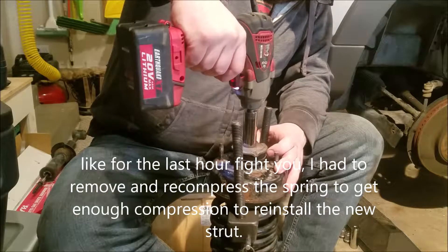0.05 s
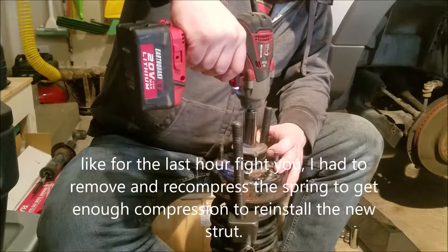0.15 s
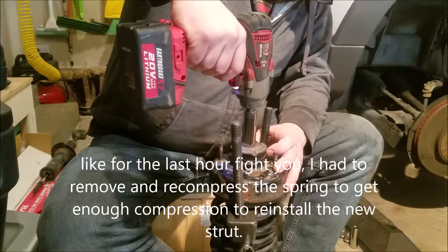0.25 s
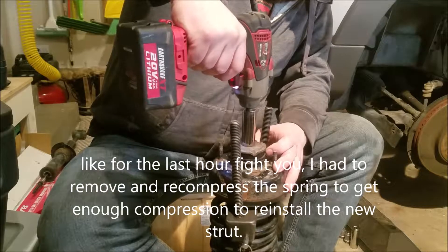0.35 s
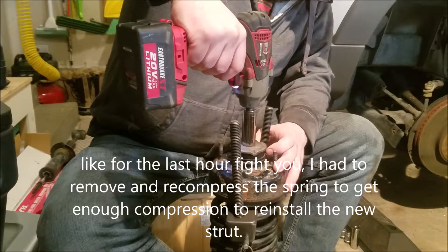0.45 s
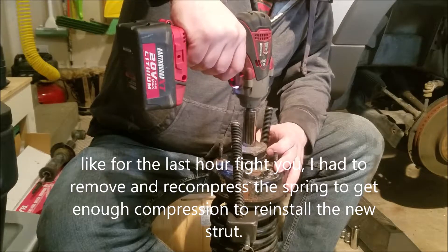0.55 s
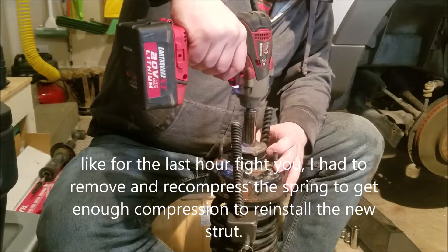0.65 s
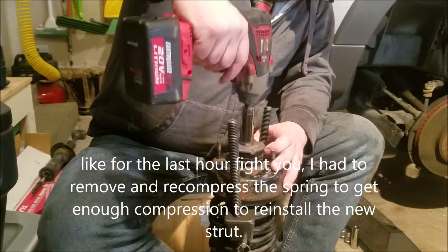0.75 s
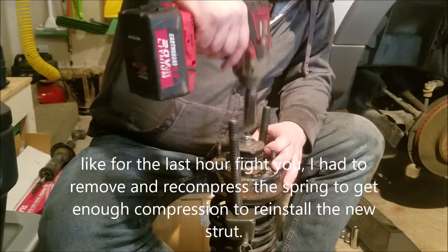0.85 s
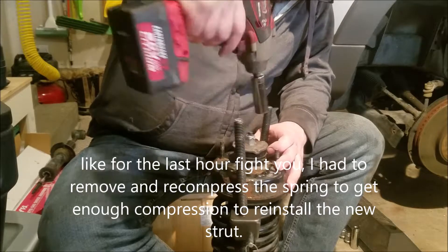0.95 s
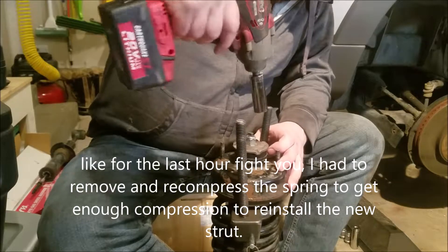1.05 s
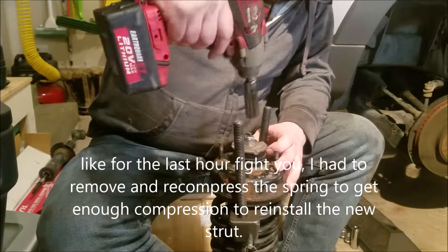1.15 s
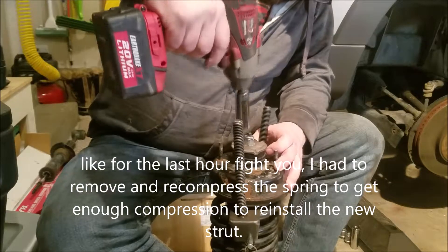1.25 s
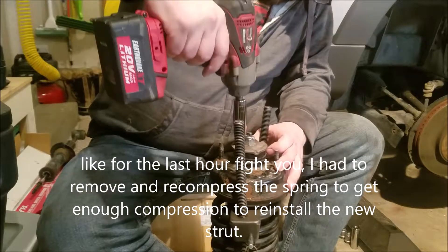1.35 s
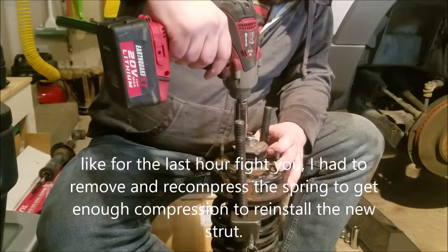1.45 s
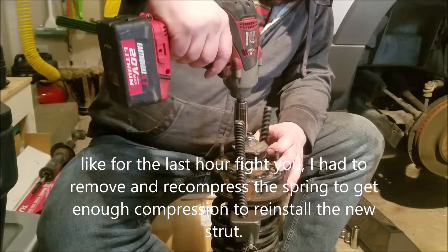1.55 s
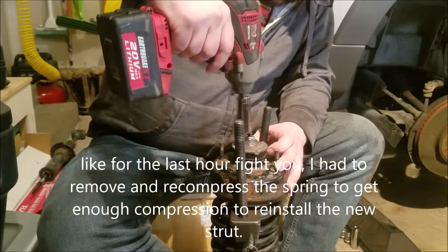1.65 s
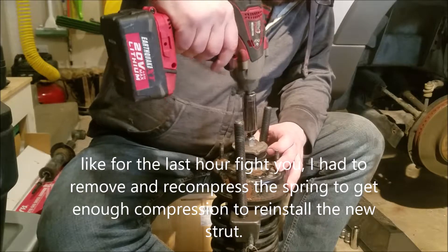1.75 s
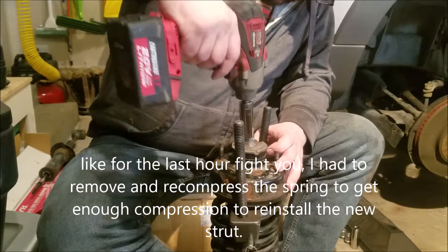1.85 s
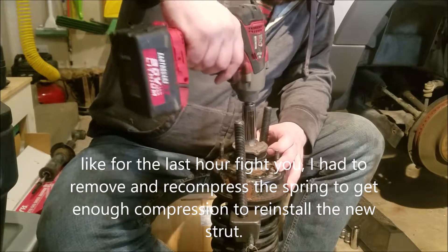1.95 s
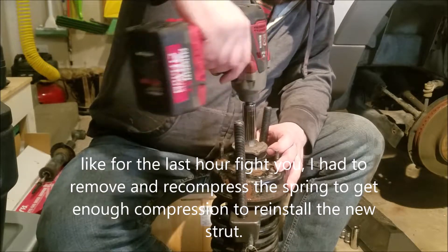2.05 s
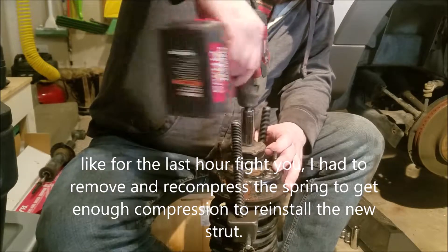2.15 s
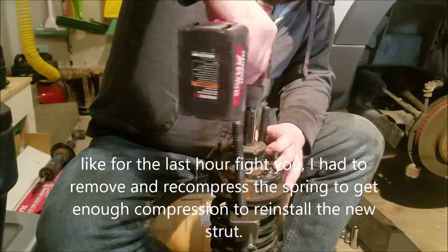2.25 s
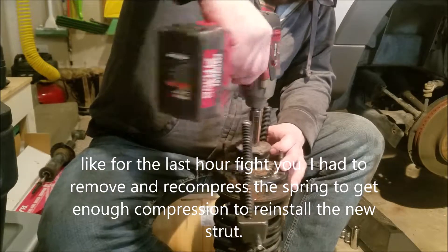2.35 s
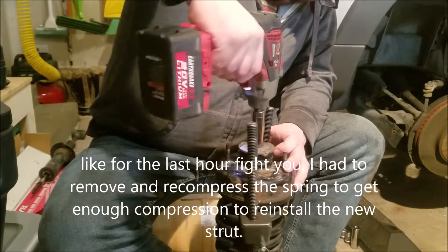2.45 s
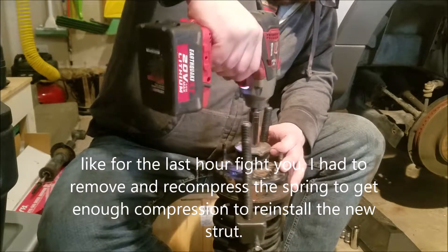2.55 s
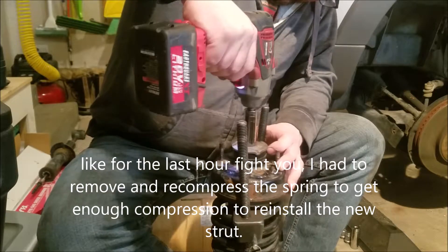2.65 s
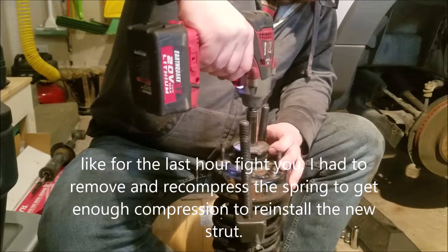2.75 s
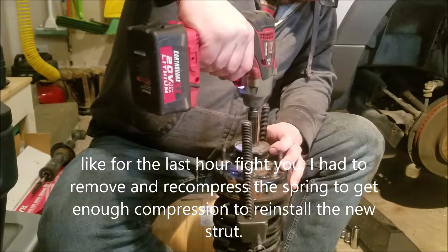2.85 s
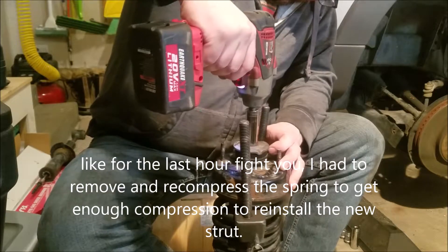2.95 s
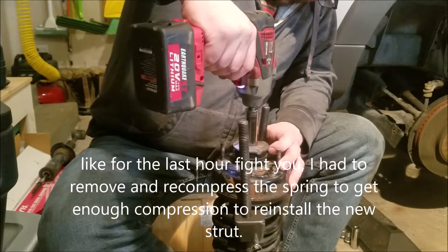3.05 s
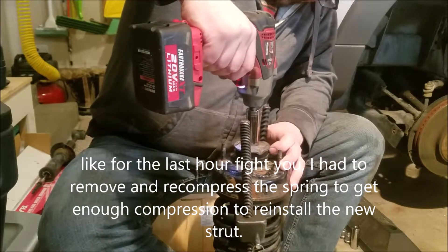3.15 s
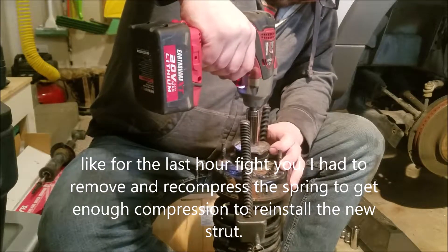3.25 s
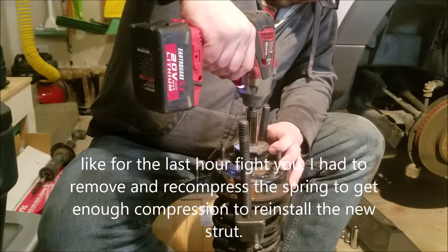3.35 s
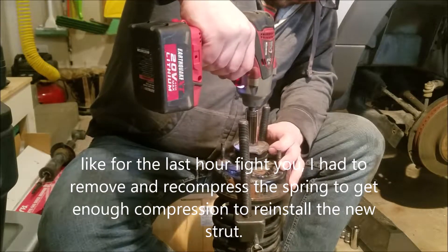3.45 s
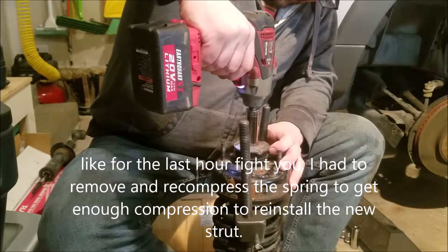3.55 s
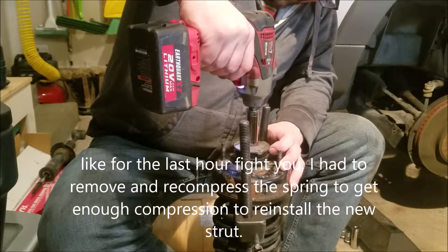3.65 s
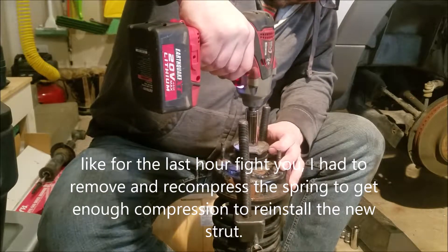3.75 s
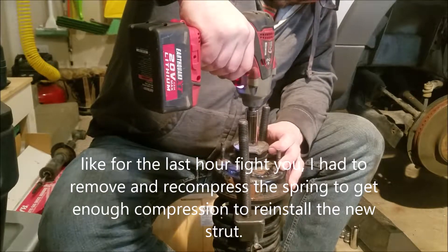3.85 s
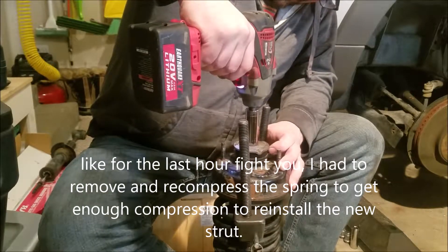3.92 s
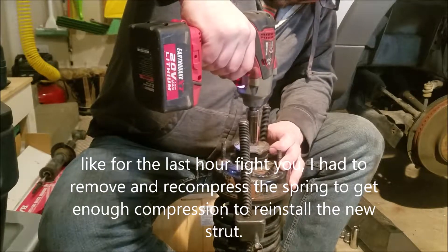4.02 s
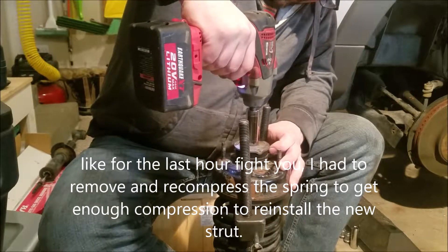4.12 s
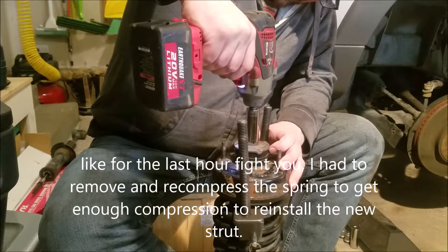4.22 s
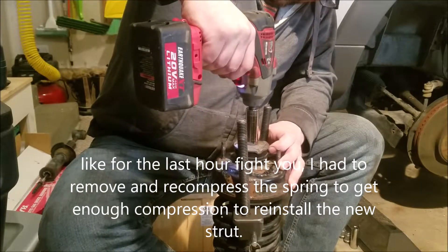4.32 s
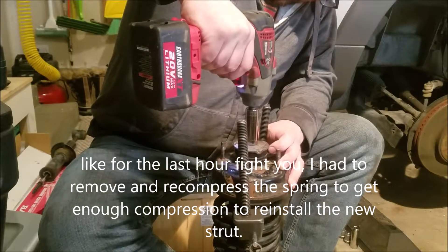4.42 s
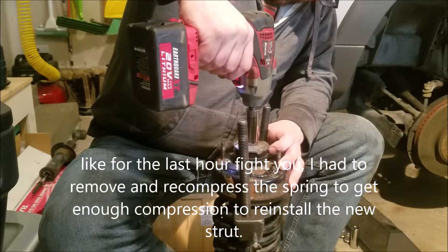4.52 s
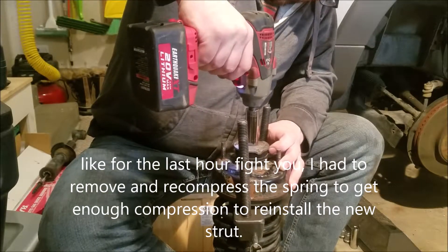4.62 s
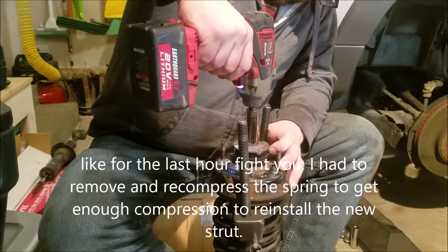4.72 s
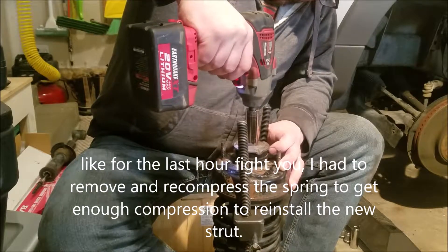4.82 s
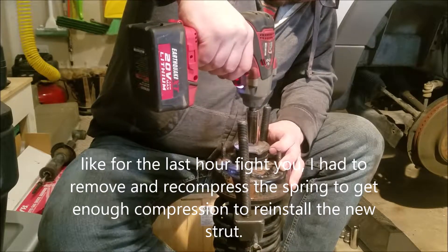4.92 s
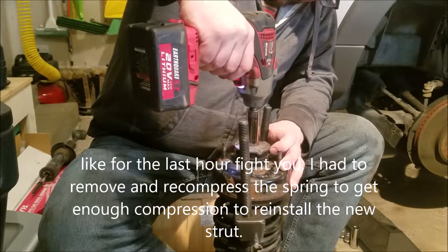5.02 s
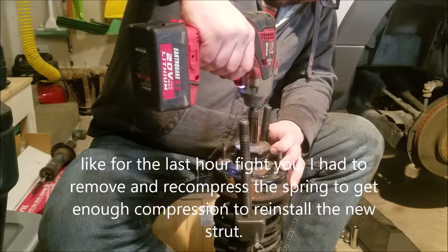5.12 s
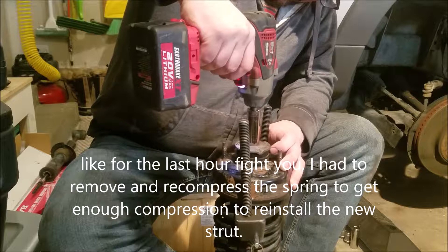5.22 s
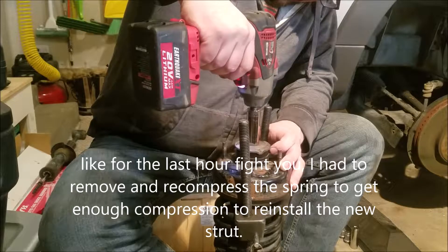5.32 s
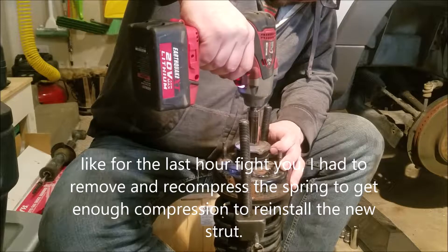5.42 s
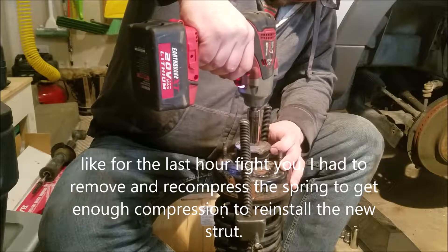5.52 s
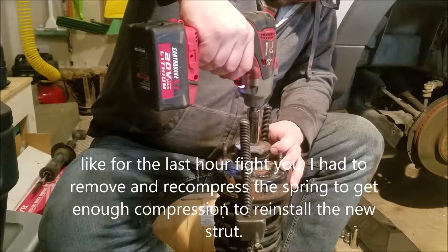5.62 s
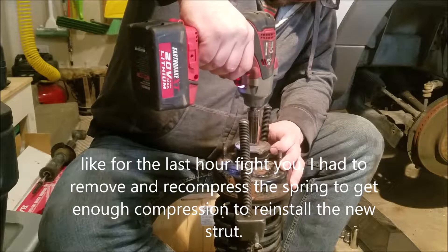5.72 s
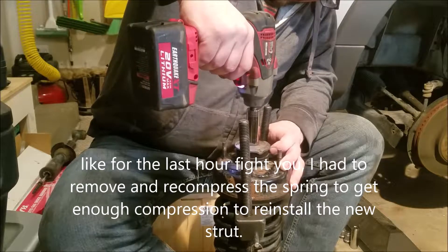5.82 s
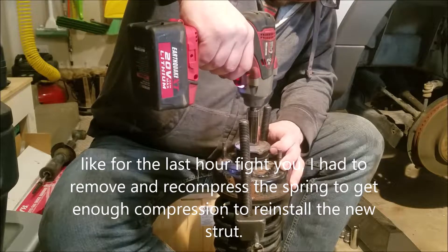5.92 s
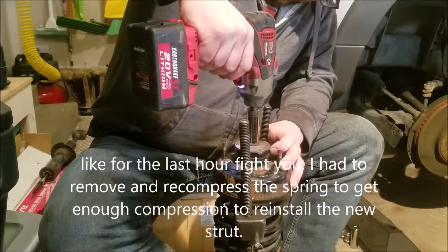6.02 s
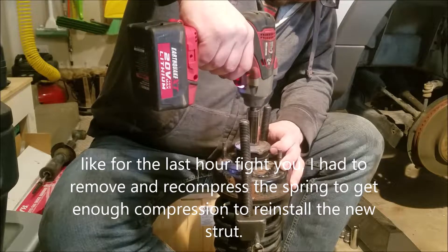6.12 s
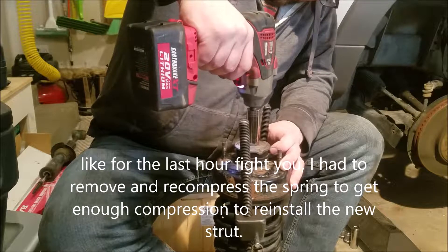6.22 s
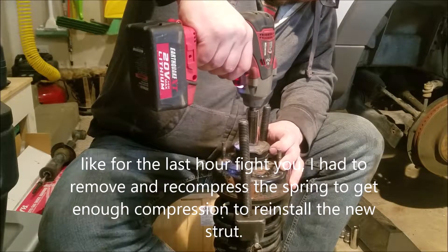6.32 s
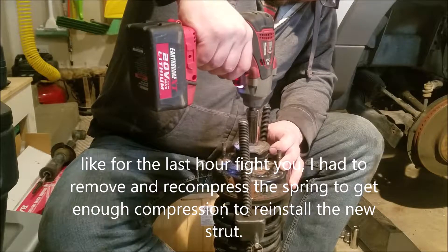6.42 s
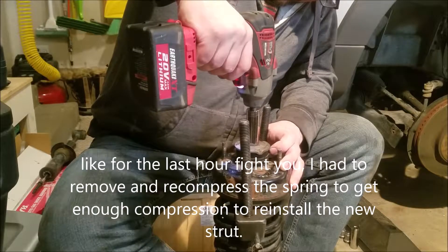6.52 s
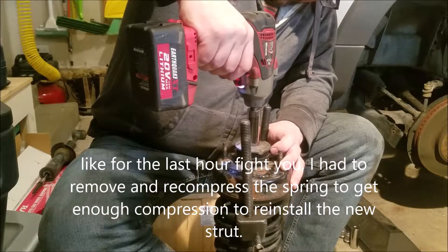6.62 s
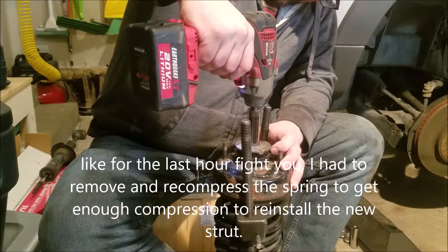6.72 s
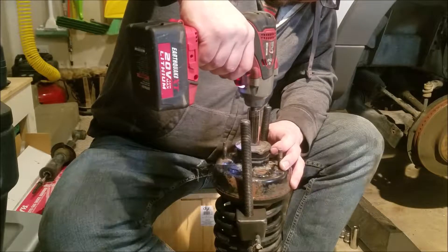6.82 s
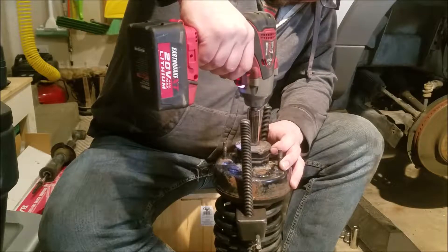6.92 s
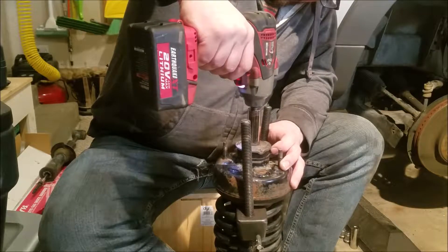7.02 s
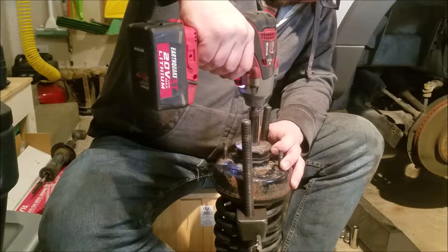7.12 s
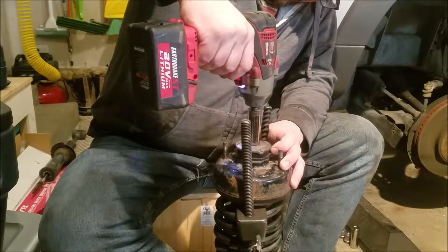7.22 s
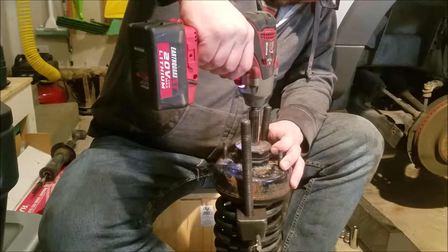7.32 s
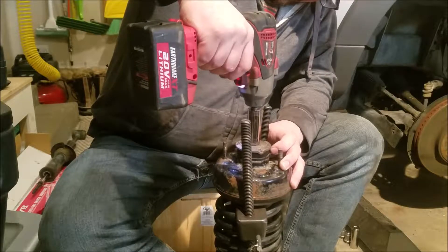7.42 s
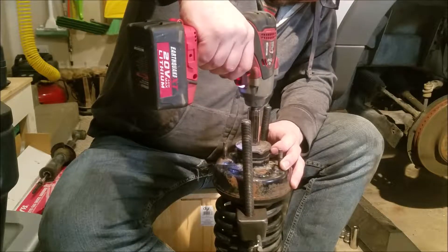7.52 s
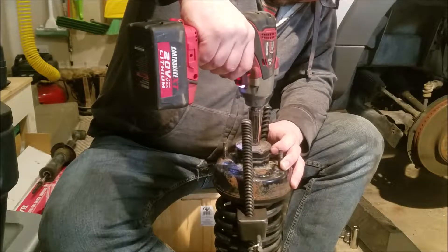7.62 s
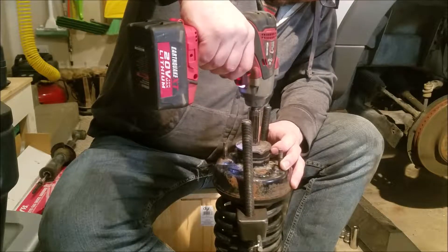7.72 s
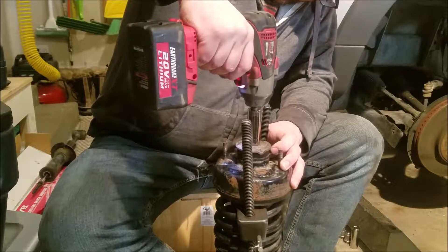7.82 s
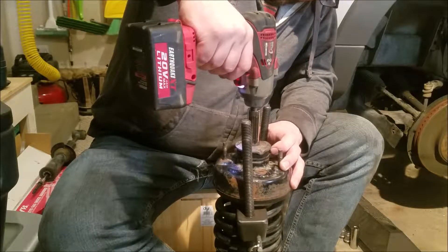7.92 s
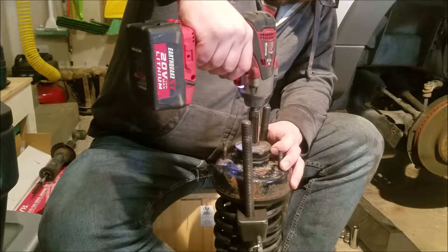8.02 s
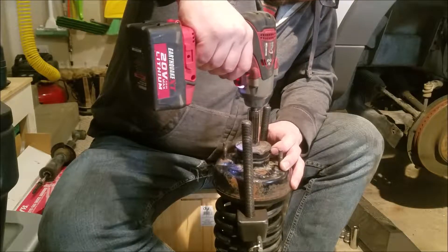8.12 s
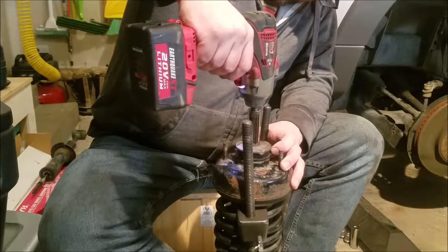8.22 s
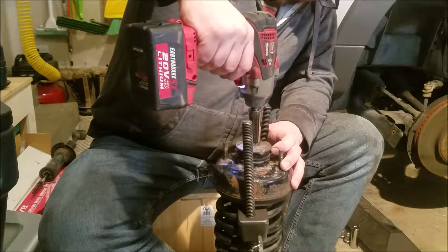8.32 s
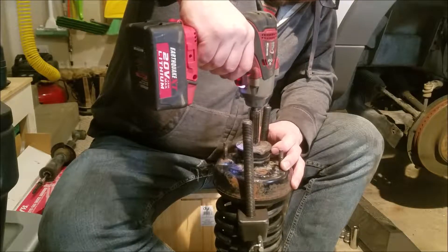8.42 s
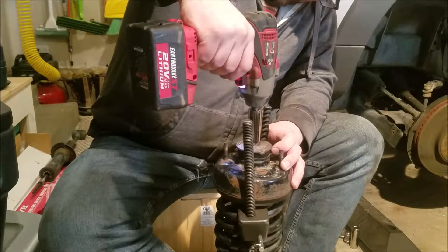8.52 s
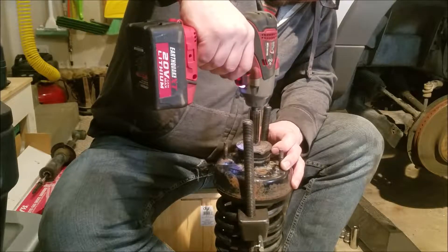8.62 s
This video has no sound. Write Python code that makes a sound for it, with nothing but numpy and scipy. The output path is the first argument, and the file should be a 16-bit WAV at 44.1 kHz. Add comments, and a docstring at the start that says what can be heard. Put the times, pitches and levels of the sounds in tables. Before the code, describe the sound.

A brief burst of loose, chattering impact-wrench hammering cuts off, leaving a short garage reverberation and near silence. The socket taps and rubs against threaded steel with sharp little clacks, then duller bumps. The tool kicks in again and pounds without a break at a buzzing fast rate, bright, clashing and metallic, with slightly uneven blows. Close stereo microphone, hard reflective room, occasional soft low pops on the left side.

```python
"""In a small garage, a cordless impact wrench hammers a nut down the threaded rod of a spring strut.
It stops, the socket is lifted, tapped and seated on the nut again; hammering resumes at about 56 blows a second.
Each blow is a click that drives a noisy steel clash and resonances of socket, hammer case, strut, spring and nut.
Knocks are ringing modes with a thud, and rubbing is coloured grit; all of these reverberate in the garage.
Short pressure pops, almost only on the left, a faint low flutter and still air lie outside the reverberation."""
import sys
import numpy as np
from scipy import signal
from scipy.fft import rfft, irfft, next_fast_len
from scipy.io import wavfile

SR = 44100
rng = np.random.default_rng(int(sys.argv[2]) if len(sys.argv) > 2 else 0)


def dump(signal):
    """Clip the signal to [-1, 1] and save it as 16-bit WAV at the path in sys.argv[1]."""
    limited = np.clip(np.atleast_2d(signal).T, -1, 1)
    pcm = np.round(limited * 32767).astype(np.int16)
    wavfile.write(sys.argv[1], SR, pcm)


N = 382347
TIME = np.arange(N) / SR

# All table levels are relative within the mix.
# Colour of the still garage. Each row: frequency in Hz, density in dB per Hz.
AIR_COLOUR = [(15, -26.5), (25, 2), (142, 5), (196, 0), (326, -5), (573, -3), (2240, -10), (5010, -22.5),
              (15000, -36.5)]
# Garage reverberation. Each row: frequency in Hz, t60 in seconds, level in dB.
GARAGE_DECAY = [(150, .45, -10), (500, .42, -11), (1400, .42, -7.5), (2500, .42, -3.5), (7000, .34, -3),
                (15000, .27, -3)]
# The loudest pops. Each row: time in seconds, peak in dB.
LOUD_POPS = [(0.282, -20.5), (0.354, -25), (0.547, -25), (0.567, -17), (0.6, -19.5), (4.526, -23),
             (4.596, -20.5), (4.988, -18), (5.062, -23), (5.151, -20.5), (5.256, -22.5), (5.381, -23),
             (6.576, -21.5), (6.72, -19.5), (7.507, -17.5), (7.811, -26), (7.866, -16.5), (7.973, -15),
             (8.513, -21), (8.546, -23)]
# Colour of sliding steel. Each row: frequency in Hz, density in dB per Hz.
SLIDE_COLOUR = [(60, -13), (130, -9), (250, 2), (620, 15), (1000, 5.5), (1500, 7.5), (2800, 2.5),
                (4500, -8.5), (8000, -27), (15000, -14)]
# The socket rubs along the steel. Each row: start and end in seconds, starting level in dB, swell in dB.
RUBS = [(1.333, 1.57, -65.5, -7), (1.577, 1.832, -67, 6), (1.835, 1.92, -33, -5), (2.073, 2.167, -38.5, -1),
        (2.215, 2.39, -58, -4), (2.394, 2.43, -51, 30)]
# The socket knocks on rod and nut. Each row: time in seconds, level in dB, low-pass edge in Hz, thud share in dB.
KNOCKS = [(1.331, -43, 2240, -22), (1.425, -36, 2480, -28), (1.833, -22, 9300, -3),
          (1.838, -22.5, 6000, -1), (1.872, -34, 7000, 0), (1.899, -20, 5030, -3.5),
          (2.052, -38, 2500, -21), (2.071, -28.5, 7100, -26), (2.121, -36, 3970, 9), (2.14, -26, 4500, 4),
          (2.261, -44, 1200, 12), (2.324, -37, 1200, 6.5), (2.343, -37, 1180, 7)]
# What the knocks ring, before chance shifts. Each row: frequency in Hz, level in dB, t60 in seconds.
KNOCK_MODES = [(560, 0, 0.04), (650, -7, 0.053), (790, -2, 0.056), (1470, 4.5, 0.048), (1580, -7, .03),
               (1880, -7, 0.026), (2150, 1, 0.034), (2450, 5, 0.03), (2900, 4.5, 0.044), (3170, 3, 0.023),
               (3680, 1, 0.019), (11200, 6, .012), (13300, 5, .012), (14500, -6, .012)]
# The trigger is held. Each row: start and end in seconds, blows per second short of full speed at first,
# socket off its seat at first (0-1), nut loose at first (0-1).
TRIGGER_RUNS = [(0.001, 0.695, 8.1, 1, 0), (2.485, 8.66, 0, 0, 1)]
# Single blows as the hammer runs down or catches. Each row: time in seconds, strength in dB.
STRAY_BLOWS = [(0.715, -12), (2.424, -4), (2.449, -3), (2.459, 6)]
# Blows of set strength. Each row: time in seconds (the nearest blow is used), strength in dB.
HARD_BLOWS = [(.408, 1.5), (4.242, 2), (5.314, 1.5), (5.846, 1), (6.346, 2), (6.382, 3), (8.639, 1)]
# How strongly each part answers the blows. Each entry: level in dB, extra dB with the socket off its seat,
# extra dB with the nut loose, drift in dB per second of tightening.
COUPLING = {"clash": (-4, 3, 2, 0.28), "case": (-6, -2.5, -1, 0.15), "strut": (-3.5, -17, 2.5, -1.2),
            "strut overtones": (-6.5, -7, 3.5, 0), "socket": (-1.25, -17.5, -1.5, -.5),
            "nut": (-2, -8, 4, -1.77), "spring": (-6, -6.5, -12, -0.3)}
# Clash of hammer, anvil and nut. Each row: frequency in Hz, density in dB per Hz, left minus right in dB,
# t60 in seconds.
CLASH = [(145, -12, 34.5, 0.022), (400, 2.5, 12, 0.038), (940, -8, 10, 0.27), (2000, -3, -7, 0.21),
         (3530, 7, -0.5, 0.064), (4680, 5.5, -3, 0.034), (6830, 6, 4.5, 0.019), (8500, -5, -2.5, 0.015),
         (9340, 5, 18.5, 0.012), (11600, 5.5, 4, 0.032), (12700, 16, 6, 0.012), (15400, 9.5, 2.5, .03),
         (17200, -14, 3.5, .03)]
# Resonances of the parts. Each row: frequency in Hz, width of one resonator in Hz, level in dB,
# left minus right in dB. The last row of the hammer case is its broad top resonance.
HAMMER_CASE = [(1930, 230, -15, -19), (2182, 122, -4.5, 8.5), (2385, 130, -11.5, -10),
               (3180, 1000, -17.5, 22.5)]
STRUT = [(443, 84, -4.5, -1.5), (673, 164, -10, -2), (725, 133, -10.5, -8), (1222, 400, -15.5, -24.5)]
SOCKET = [(1383, 163, -4, 5.5), (1539, 96, -14, 4.7)]
NUT = [(378, 130, -15.5, 2), (606.6, 33, -13, -8), (1815, 216, -8.5, -10.5), (3160, 1600, -10.5, -3)]
SPRING = [(56.6, 21, -27.5, 0.5), (172.5, 21, -22, 1), (216.2, 30, -19, -1), (277.4, 22, -16.5, 0)]
# The unseated socket chatters on the nut and shakes the tool; columns as for the resonances above.
CHATTER = [(155, 38, -15.5, -4), (700, 150, -12, -6.5)]
# The ring of the hammer case swells and wanes. Each row: time in seconds, level in dB.
CASE_SWELL = [(.25, 0), (.45, 1), (2.6, 3), (4, -2), (5.3, 1.5), (6.4, 0.5), (8.66, -1.5)]

# the motor spins up with this time constant, then slows a little as the strut's spring is wound down
BLOWS_PER_S, SPIN_UP_S, SAG_HZ_PER_S = 56.48, .11, .131
# time constants in which the socket works onto the nut and the loose nut takes up its play
SEAT_S, TAKE_UP_S = .5, .6
STEADY_PLAY_S = .00004   # timing scatter of the tightly held parts
FORCE_DB = -20.5         # overall level of the wrench
FAINT_POP_SHARE, FAINT_POP_DB = .04, -29.5   # share of blows given a faint pop, and its relative level
RUB_ATTACK_S, RUB_RELEASE_S = 0.0032, 0.014  # time constants


def from_db(db):
    """Decibels to gain."""
    return 10 ** (np.asarray(db) / 20)


def rms_one(x):
    """Scale to unit rms."""
    return x / np.sqrt(np.mean(x ** 2) + 1e-20)


def in_time(rows):
    """Each column of a curve at every sample."""
    s, *columns = np.transpose(rows)
    return [np.interp(TIME, s, c) for c in columns]


def at_hz(rows, hz):
    """Each column of a spectrum at the given frequencies, interpolated on a log scale."""
    f, *columns = np.transpose(rows)
    return [np.interp(np.log(hz + 1e-9), np.log(f), c) for c in columns]


def pan(db):
    """Left and right gains for a level difference."""
    return from_db(np.array([[db], [-db]]) / 2)


def filtered(x, hz, kind, order=2):
    """Butterworth filter."""
    sos = signal.butter(order, np.clip(hz, 10, .48 * SR), kind, fs=SR, output="sos")
    return signal.sosfilt(sos, x + 1e-18)


def clicks(times, sizes):
    """Impulses at the given times."""
    return np.bincount(np.clip(np.round(times * SR).astype(int), 0, N - 1), sizes, N)


def resonate(x, hz, width_hz):
    """A two-pole resonance with gain 1 on top."""
    r = np.exp(-np.pi * width_hz / SR)
    feed = np.array([1, 0, -1]) * (1 - r * r) / 2
    return signal.lfilter(feed, [1, -2 * r * np.cos(2 * np.pi * hz / SR), r * r], x + 1e-18)


def ring(x, hz, t60):
    """A unit click sets a decaying sine of starting height 1 ringing."""
    r = from_db(-60 / (t60 * SR))
    w = 2 * np.pi * hz / SR
    return signal.lfilter([0, np.sin(w)], [1, -2 * r * np.cos(w), r * r], x + 1e-18)


def fade(x, t60):
    """Each click becomes a dying envelope."""
    return signal.lfilter([1], [1, -from_db(-60 / (t60 * SR))], x + 1e-18)


def coloured(x, spectrum):
    """Give a stereo noise a spectrum; rms 1."""
    size = next_fast_len(N)
    gain = from_db(at_hz(spectrum, np.arange(size // 2 + 1) * SR / size)[0])
    return rms_one(irfft(rfft(x, size) * gain, size)[:, :N])


def progress():
    """At every sample: seconds of tightening, how far the socket is off its seat, how loose the nut is."""
    start, end, _, unseated, loose = np.transpose(TRIGGER_RUNS)
    run = np.searchsorted((end[:-1] + start[1:]) / 2, TIME)
    age = np.maximum(TIME - start[run], 0)
    return age, unseated[run] * np.exp(-age / SEAT_S), loose[run] * np.exp(-(age / TAKE_UP_S) ** 2)


def coupling(part):
    """Gain from the hammer to one part as the socket seats and the nut tightens."""
    age, unseated, loose = progress()
    db, unseated_db, loose_db, db_per_s = COUPLING[part]
    return from_db(db + unseated_db * unseated + loose_db * loose + db_per_s * age)


def still_air(level_db=-76):
    """The garage's faint still air: steady coloured noise, independent left and right."""
    return from_db(level_db) * coloured(rng.standard_normal((2, N)), AIR_COLOUR)


def garage(x, first_echo_s=0.0054, alike_below_hz=900):
    """Dense reflections from close walls and clutter; the treble dies first."""
    t = TIME[:SR // 2]
    response, edges = 0, np.geomspace(60, 20000, 11)
    for band in zip(edges, edges[1:]):
        hz = np.sqrt(band[0] * band[1])
        alike = 1 / (1 + (hz / alike_below_hz) ** 2)   # low reflections agree left and right
        noise = rng.standard_normal((3, len(t)))
        tail = (np.sqrt(alike) * noise[2] + np.sqrt(1 - alike) * noise[:2]) * (t > first_echo_s)
        t60, wet_db = at_hz(GARAGE_DECAY, hz)
        tail = rms_one(tail * from_db(-60 * t / t60)) / np.sqrt(len(t))
        response = response + from_db(wet_db) * filtered(tail, band, "band")
    return x + signal.oaconvolve(x, response, axes=1)[:, :N]


def flutter(level_db=-50, top_hz=75, side_db=4):
    """A faint low flutter while the wrench runs: low noise that follows the spring's coupling."""
    running = sum((TIME > start) & (TIME < end) for start, end, *_ in TRIGGER_RUNS)
    shake = rng.standard_normal((2, N)) * running * coupling("spring")
    rumble = filtered(filtered(shake, top_hz, "low"), 25, "high")
    return from_db(level_db) * pan(side_db) * rms_one(rumble)


def pops(blow_times, level_db=10, pulse_hz=170, leak_hz=55, right_db=-32):
    """Short lopsided pressure pulses, almost only on the left: a few loud, and faint ones on chance blows."""
    s, db = np.transpose(LOUD_POPS)
    faint = (rng.random(len(blow_times)) < FAINT_POP_SHARE) * from_db(FAINT_POP_DB)
    # the faint pops are held back while the nut is loose
    train = clicks(s, from_db(db)) + clicks(blow_times, faint) * (1 - progress()[2])
    pulse = filtered(signal.unit_impulse(SR // 10), pulse_hz, "low")
    pulse = filtered(pulse, leak_hz, "high", order=1)
    popping = signal.oaconvolve(train, -pulse / pulse.max())[:N]
    return from_db(level_db) * popping * from_db([[0], [right_db]])


def slide(grain_db=4, catch_db=3, catches_per_s=220):
    """Gritty rubbing of the socket on rod and nut, catching unevenly on the thread."""
    grit = rng.standard_normal((2, N)) * from_db(grain_db * rng.standard_normal(N))
    catches = from_db(catch_db * rng.standard_normal(N)[(TIME * catches_per_s).astype(int)])
    level = 0
    for start, end, db, swell_db in RUBS:
        before, after = np.maximum(start - TIME, 0), np.maximum(TIME - end, 0)
        edges = np.exp(-before / RUB_ATTACK_S - after / RUB_RELEASE_S)
        level = level + edges * from_db(db + np.interp(TIME, [start, end], [0, swell_db]))
    # each side hears some of the other's grit
    return level * coloured(catches * (grit + grit[::-1] / 2), SLIDE_COLOUR)


def knock_ring(strike, detune):
    """Each touch presses the parts together differently and shifts their modes in pitch, level and sign."""
    steel = 0
    for hz, mode_db, t60 in KNOCK_MODES:
        size = from_db(mode_db + rng.uniform(-1.3, 5.2)) * rng.choice([-1, 1])
        steel = steel + size * ring(strike, hz * (1 + detune * rng.standard_normal()), t60)
    return steel


def knocks(ring_db=-15, crack_db=-6, crack_t60=0.018, thud_db=-12, thud_hz=240, thud_t60=0.11, detune=0.031):
    """The socket is set on the nut: a low-passed ring and crack, with a thud in the strut."""
    s, db, bright_hz, heavy_db = np.transpose(KNOCKS)
    out = np.zeros((2, N))
    strike = signal.unit_impulse(SR // 3)
    for at, level_db, top_hz, weight_db in zip((s * SR).astype(int), db, bright_hz, heavy_db):
        steel = knock_ring(strike, detune)
        crack = fade(strike, crack_t60) * rng.standard_normal((2, len(strike)))
        knock = filtered(from_db(ring_db) * steel + from_db(crack_db) * crack, top_hz, "low", order=3)
        thud = ring(strike, thud_hz * np.exp(rng.normal(0, 0.12)), thud_t60)
        knock += from_db(thud_db + weight_db) * thud
        out[:, at:at + len(strike)] += from_db(level_db) * knock
    return out


def blows(jitter_s=STEADY_PLAY_S, uneven_db=1.45):
    """Times and strengths of the hammer blows: nearly periodic, never equally hard."""
    steady = []
    for start, end, short, _, _ in TRIGGER_RUNS:
        age = TIME[TIME < end - start]
        rate = BLOWS_PER_S - short * np.exp(-age / SPIN_UP_S) - SAG_HZ_PER_S * age
        struck = np.cumsum(rate) / SR   # a blow falls at each whole count
        steady = np.r_[steady, start + np.interp(np.arange(struck[-1]), struck, age)]
    steady = steady + jitter_s * rng.standard_normal(len(steady))
    level_db = rng.normal(0, uneven_db, len(steady))
    for s, hard_db in HARD_BLOWS:
        level_db[np.abs(steady - s).argmin()] = hard_db
    stray_s, stray_db = np.transpose(STRAY_BLOWS)
    return np.r_[steady, stray_s], from_db(np.r_[level_db, stray_db])


def rebound(times, sizes, delay_s, scatter_s, size_db):
    """The loose socket strikes again shortly after each blow."""
    late, hard = rng.standard_normal((2, len(times)))
    return clicks(times + np.abs(delay_s + scatter_s * late), sizes * from_db(size_db + 3.9 * hard))


def clash(times, sizes, crack_db=13, grain_db=6.0, alike_below_hz=3500):
    """Steel on steel: a crack, two rebounds and a dense, dying ring of noise bands."""
    hits = clicks(times, sizes)
    hits = hits + rebound(times, sizes, 0.0029, 0.000067, -11.0)
    hits = hits + rebound(times, sizes, 0.0013, 0.00024, -29.5)
    grains = rng.standard_normal((2, 3, N)) * from_db(grain_db * rng.standard_normal(N))
    out = np.zeros((2, N))
    edges = np.r_[np.geomspace(100, 3000, 7), np.linspace(4000, 17000, 12)]
    for k, band in enumerate(zip(edges, edges[1:])):
        hz = np.sqrt(band[0] * band[1])
        db, side_db, t60 = at_hz(CLASH, hz)
        alike = 1 / (1 + (hz / alike_below_hz) ** 2)   # short waves differ between left and right
        noise = np.sqrt(alike) * grains[k % 2, 2] + np.sqrt(1 - alike) * grains[k % 2, :2]
        struck = noise * fade(hits, t60) + from_db(crack_db) * hits
        out += from_db(db) * pan(side_db) * filtered(struck, band, "band")
    return rms_one(out)


def body(modes, times, sizes, uneven_db, play_s, lag_s=0):
    """Blows pass through coupled parts (two resonators in a row), so each resonance swells before it dies."""
    out, shared = np.zeros((2, N)), rng.random(len(times))
    for k, (hz, width_hz, db, side_db) in enumerate(modes):
        hard = 2 * (rng.random(len(times)) - shared)
        scattered = times + lag_s + play_s * rng.standard_normal(len(times))
        hits = clicks(scattered, sizes * from_db(uneven_db * hard))
        mode = rms_one(resonate(resonate(hits, hz, width_hz), hz, width_hz))
        # neighbouring modes swing in opposite directions
        out += (-1) ** k * from_db(db) * pan(side_db) * mode
    return out


def wrench(times, sizes, chatter_power=1.9, bite_db=1.5):
    """One train of blows drives every ringing part; the more play a part has, the rougher it sounds."""
    tool = coupling("clash") * clash(times, sizes)
    # a blow that bites well rings case and socket together
    bites = sizes * from_db(bite_db * rng.standard_normal(len(times)))
    # case, strut and socket answer 1 to 3 ms after the crack, as the hammer recoils
    case = body(HAMMER_CASE[:-1], times, bites, uneven_db=1.5, play_s=0.00012, lag_s=.003)
    tool += coupling("case") * from_db(in_time(CASE_SWELL)[0]) * case
    # the level of the case's broad top resonance follows the clash
    case_top = body(HAMMER_CASE[-1:], times, sizes, uneven_db=3.0, play_s=0.000098, lag_s=.003)
    tool += coupling("clash") * case_top
    # as the spring is wound down, the strut's lowest mode fades and its upper modes hold
    strut_low = body(STRUT[:1], times, sizes, uneven_db=1.6, play_s=STEADY_PLAY_S, lag_s=.0015)
    tool += coupling("strut") * strut_low
    strut_upper = body(STRUT[1:], times, sizes, uneven_db=2.24, play_s=STEADY_PLAY_S, lag_s=.0015)
    tool -= coupling("strut overtones") * strut_upper
    socket = body(SOCKET, times, bites, uneven_db=1.3, play_s=STEADY_PLAY_S, lag_s=.001)
    tool += coupling("socket") * socket
    tool += coupling("nut") * body(NUT, times, sizes, uneven_db=4.5, play_s=0.00013)
    tool += coupling("spring") * body(SPRING, times, sizes, uneven_db=4.0, play_s=0.00013)
    # the chatter dies away as the socket works onto its seat
    chatter = body(CHATTER, times, sizes, uneven_db=4.5, play_s=0.00006)
    tool += progress()[1] ** chatter_power * chatter
    return from_db(FORCE_DB) * tool


def scene():
    """Tool and handling in the room, with pops and flutter, over its faint still air."""
    air = still_air()
    times, sizes = blows()
    in_room = garage(wrench(times, sizes) + knocks() + slide())
    return in_room + pops(times) + flutter() + air


def record(dry, ceiling=.8, cutoff_hz=15850):
    """The tallest peaks are rounded and the top is cut steeply."""
    rounded = ceiling * np.tanh(dry / ceiling)
    steep = signal.ellip(12, .2, 80, cutoff_hz, fs=SR, output="sos")   # 0.2 dB ripple, 80 dB stop band
    return signal.sosfilt(steep, rounded)


dry = scene()
out = record(dry)
dump(out)
```